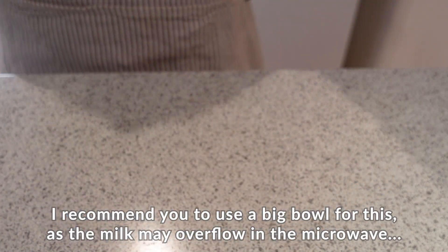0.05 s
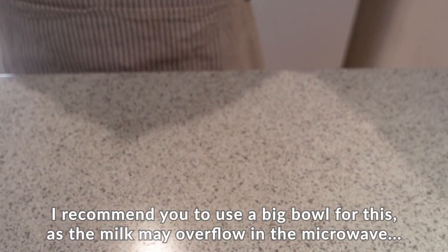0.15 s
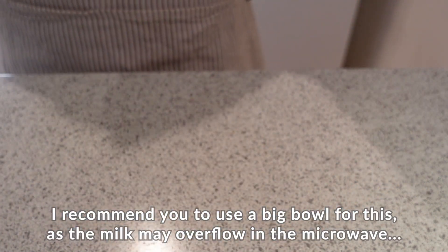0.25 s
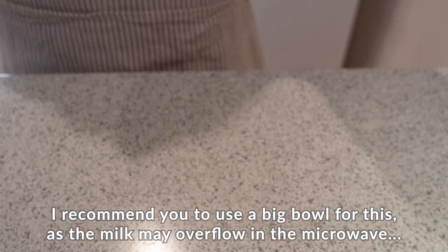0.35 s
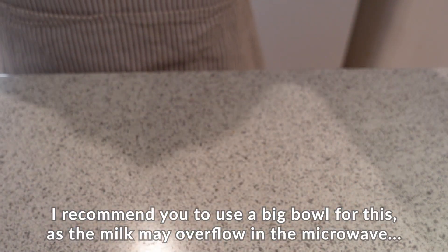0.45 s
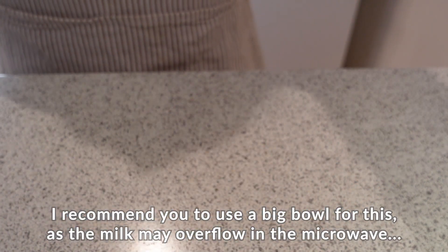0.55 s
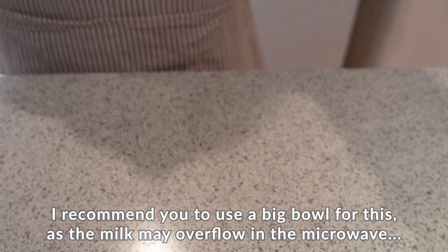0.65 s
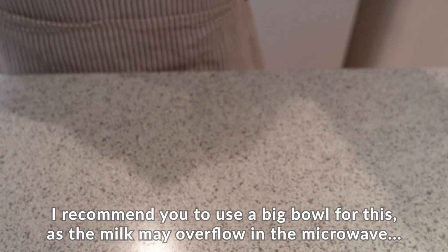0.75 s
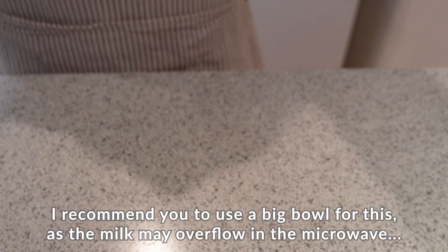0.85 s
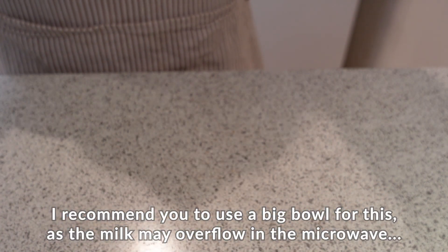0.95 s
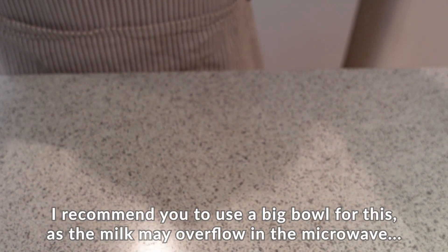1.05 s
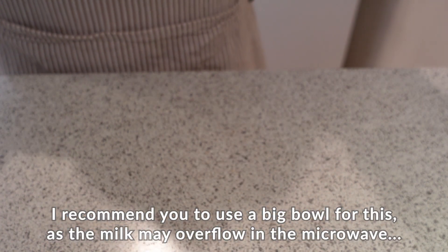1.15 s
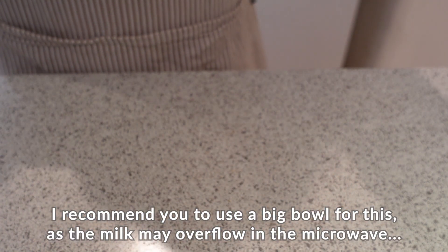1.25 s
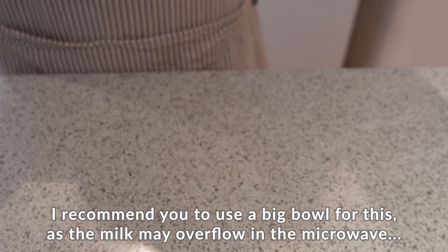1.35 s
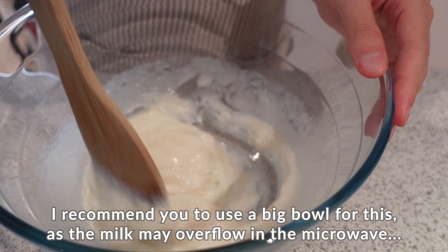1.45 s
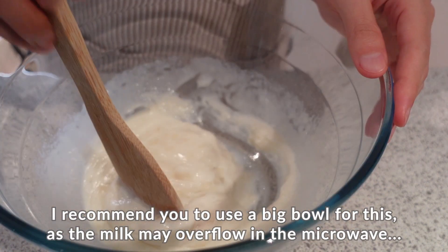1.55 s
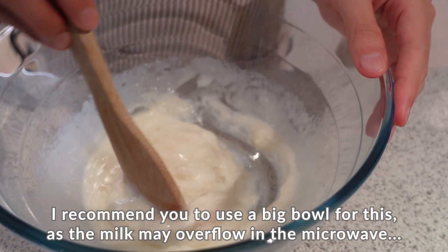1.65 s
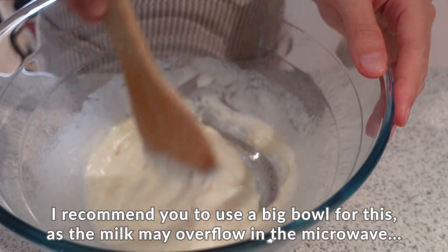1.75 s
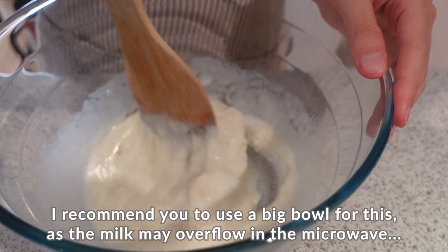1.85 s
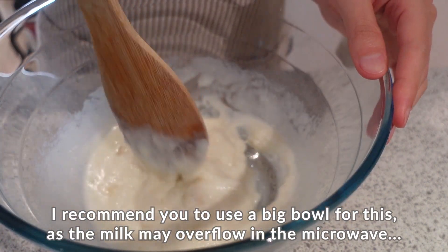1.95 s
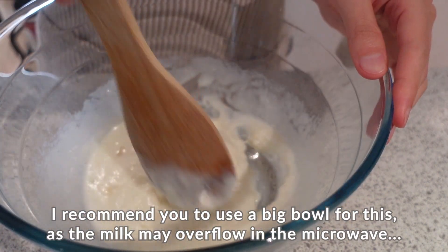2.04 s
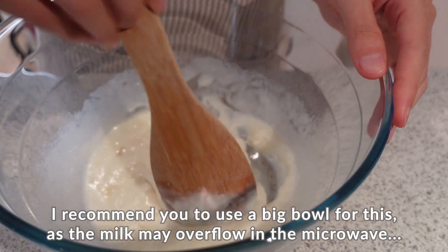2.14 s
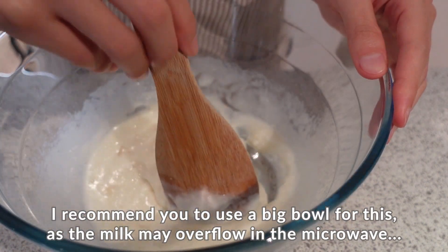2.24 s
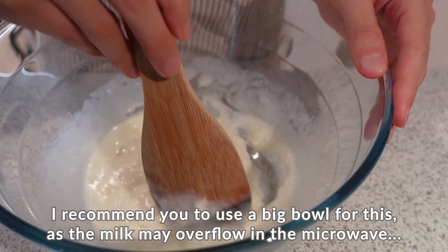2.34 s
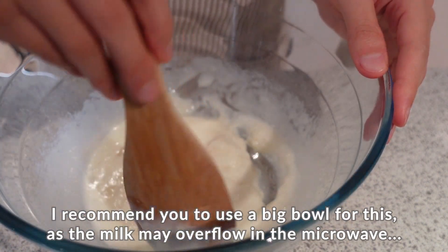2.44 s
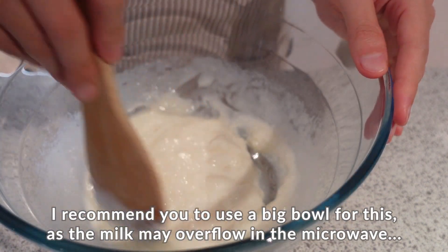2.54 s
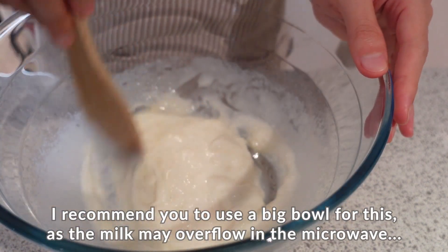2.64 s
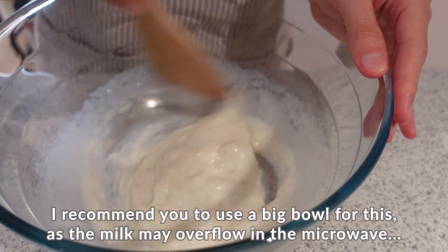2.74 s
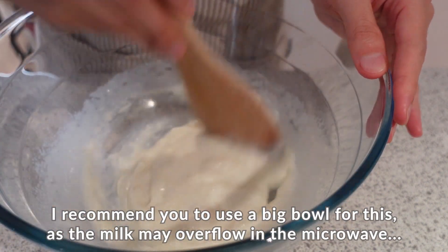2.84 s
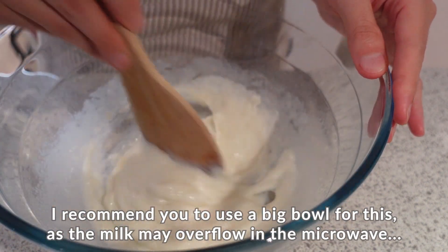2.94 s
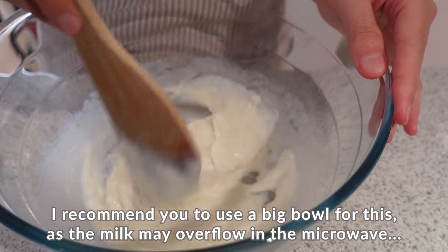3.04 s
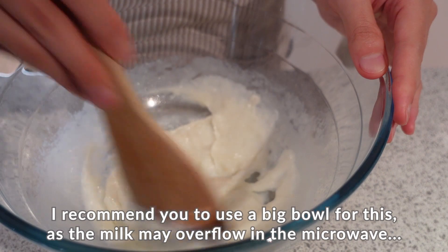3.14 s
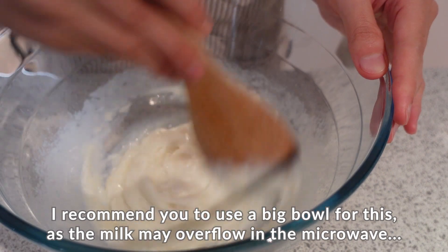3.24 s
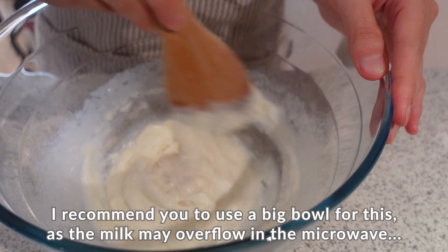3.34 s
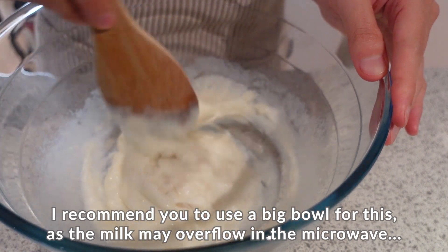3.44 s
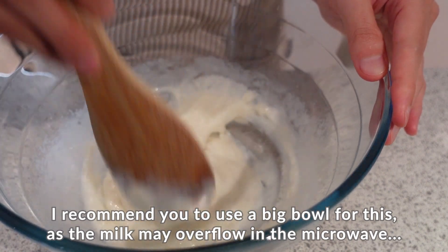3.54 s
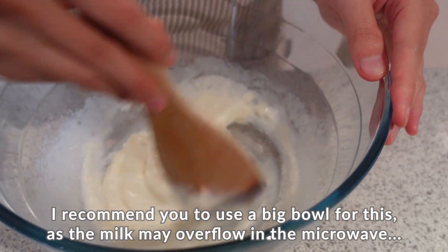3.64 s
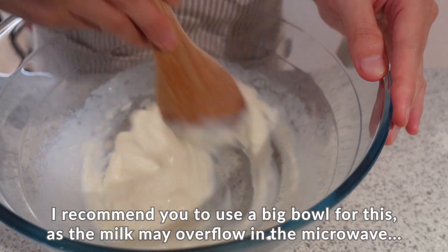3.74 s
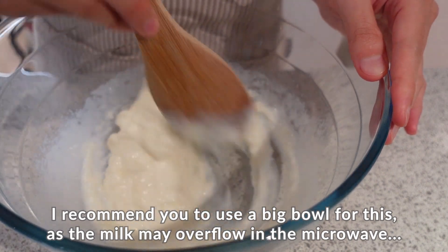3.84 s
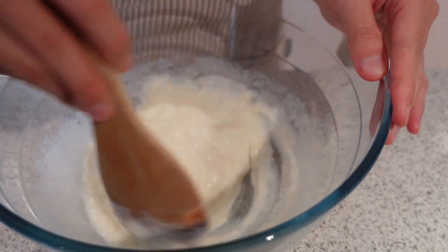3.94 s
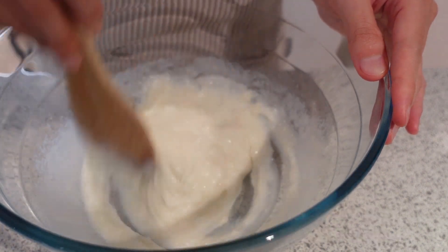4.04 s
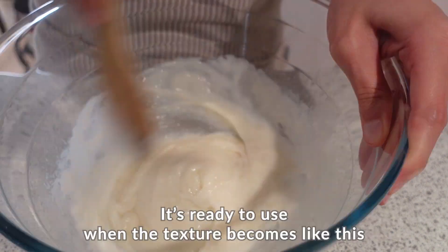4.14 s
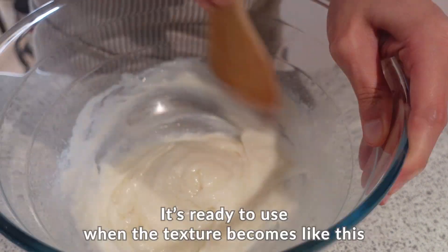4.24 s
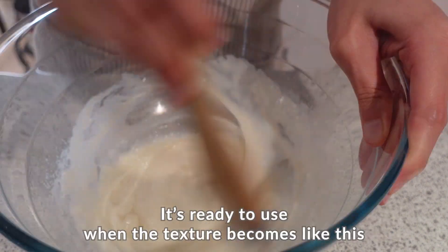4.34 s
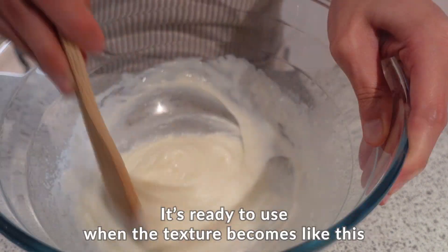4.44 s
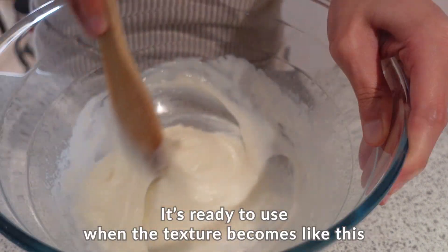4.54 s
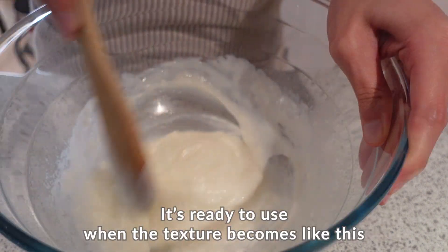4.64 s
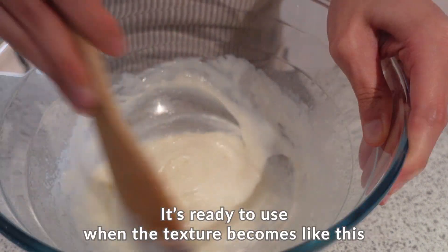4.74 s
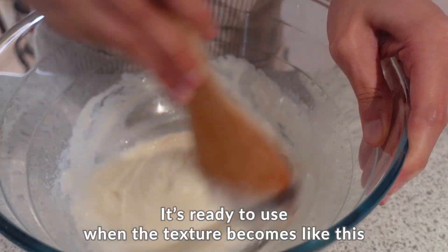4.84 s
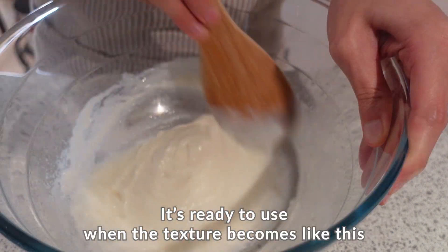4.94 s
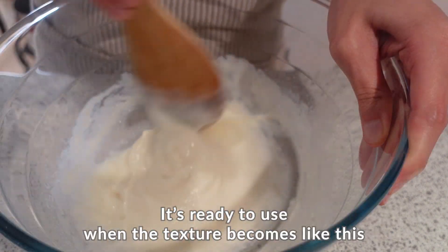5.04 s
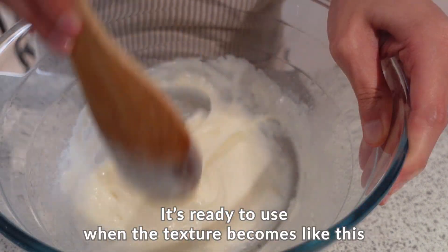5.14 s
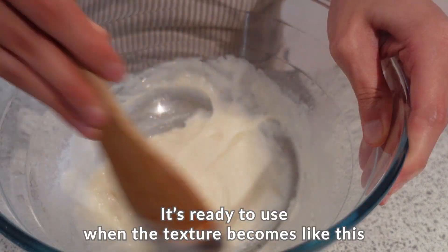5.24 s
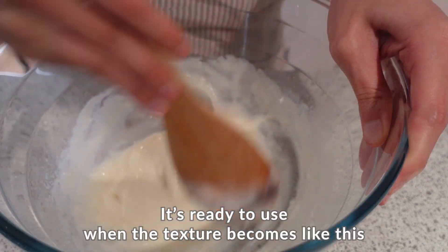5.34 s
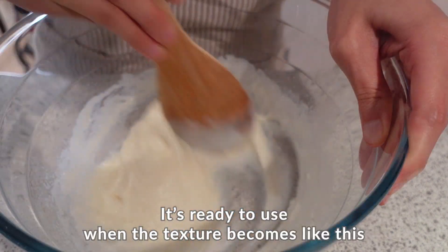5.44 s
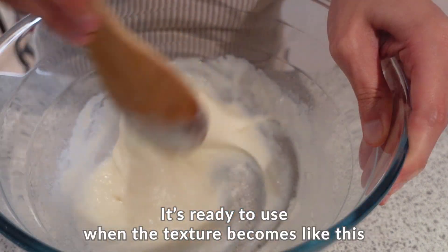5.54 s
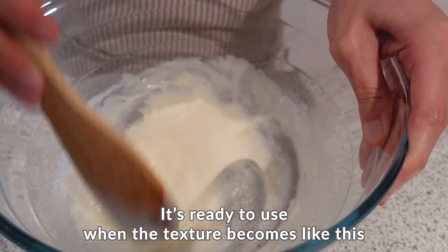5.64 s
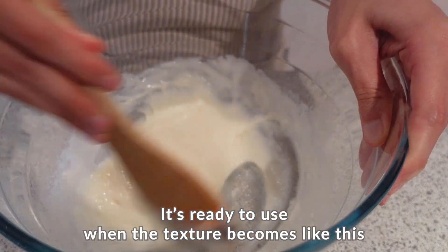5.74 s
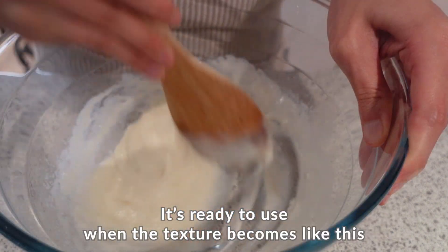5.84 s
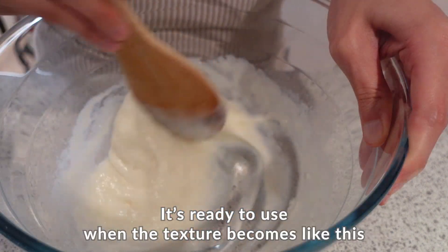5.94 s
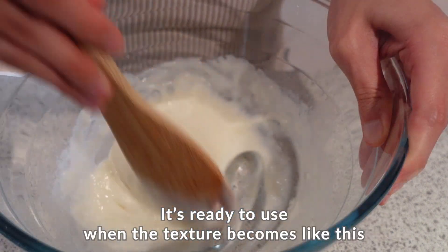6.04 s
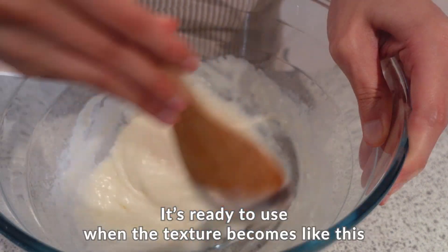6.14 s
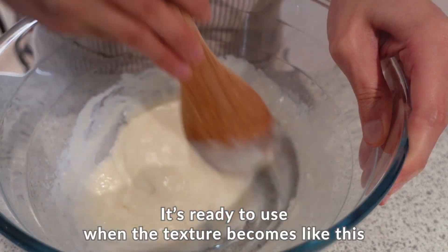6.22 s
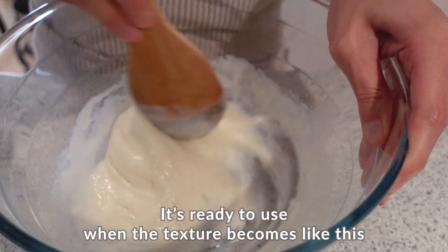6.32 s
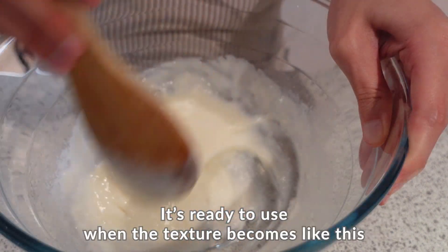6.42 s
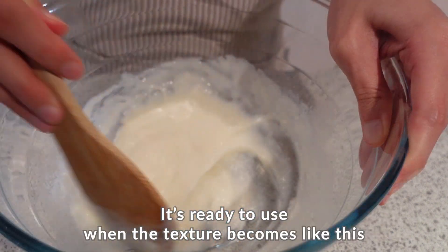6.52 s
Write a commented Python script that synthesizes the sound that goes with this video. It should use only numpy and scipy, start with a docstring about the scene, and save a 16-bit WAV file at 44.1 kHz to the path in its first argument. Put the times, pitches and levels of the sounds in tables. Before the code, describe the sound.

In a small hard kitchen with a faint appliance hum, an empty glass bowl lands on a stone counter with a brief bright clunk. Its ring is cut off abruptly, and a wooden spatula begins stirring thick batter in the hand-held bowl: muffled knocks, wet grainy smearing and sticky pops, growing louder and busier, then settling into steady strokes. Close microphone, short lively room echo.

```python
"""A small hard kitchen, humming: an empty glass bowl is set down on a stone counter and rings as damped sines.
Then a wooden spatula stirs thick batter in it. Its knocks on the held bowl are short damped sines with a slap of
noise, the batter smears as grainy filtered hiss, and smacks and pops as blinks of pitched noise. The room answers
with decaying noise echoes over hum and air; at two moments all ringing breaks off."""
import sys
import numpy as np
from scipy import signal
from scipy.fft import rfft, irfft, next_fast_len
from scipy.io import wavfile
from scipy.ndimage import uniform_filter1d, map_coordinates

SR = 44100
rng = np.random.default_rng(int(sys.argv[2]) if len(sys.argv) > 2 else 0)


def rack_gain(trim_db):
    """Turn a fader trim in dB into the linear factor to multiply a signal by."""
    fader = np.asarray(trim_db, float)
    return 10 ** (fader / 20)


def materialize(psi):
    """Save the field psi as 16-bit PCM at rate SR to the path in sys.argv[1].

    A 1-D psi becomes a single channel; in a 2-D psi each row is a channel.
    """
    bounded = np.clip(np.atleast_2d(psi).T, -1, 1)
    quanta = np.round(bounded * 32767).astype(np.int16)
    wavfile.write(sys.argv[1], SR, quanta)


N = 290178  # length in samples


def unit(x):
    """Scales a sound to rms 1."""
    return x / np.sqrt(np.mean(x ** 2) + 1e-20)


def along(points, hz):
    """Reads a curve of (Hz, value) points on a log frequency axis."""
    point_hz, value = np.transpose(points)
    return np.interp(np.log(hz + 1), np.log(point_hz + 1), value)


def curves(rows):
    """Draws one value per sample for each column after the time."""
    seconds, *columns = np.transpose(rows)
    return [np.interp(np.arange(N) / SR, seconds, column) for column in columns]


def wobble(rate):
    """A smooth random curve with rate knots a second."""
    knots = rng.standard_normal(int(N * rate / SR) + 4)
    return map_coordinates(knots, [np.arange(N) * rate / SR])


def filtered(x, response):
    """Shapes the spectrum of x by a gain that is a function of frequency."""
    size = next_fast_len(x.shape[-1] + 8192)
    spectrum = rfft(x, size) * response(np.fft.rfftfreq(size, 1 / SR))
    return irfft(spectrum, size)[..., :x.shape[-1]]


def spread(pair, alike):
    """Mixes two unrelated signals to a left and right of the given likeness per frequency."""
    def mid_side_gains(hz):
        angle = np.arccos(np.clip(along(alike, hz), -1, 1)) / 2
        return np.array([np.cos(angle), np.sin(angle)])

    mid, side = filtered(pair, mid_side_gains)
    return np.array([mid + side, mid - side])


def ring(modes, scatter_db, rough, swell, size):
    """Sums damped sines at scattered strengths; rough blurs each line, swell is its build-up in cycles."""
    t = np.arange(size) / SR
    hz, db, t60 = np.transpose(modes)[:, :, None]
    db = db + scatter_db * rng.standard_normal(db.shape)
    phase_steps = rng.standard_normal((len(hz), size))
    wander = rough * np.sqrt(hz / SR) * np.cumsum(phase_steps, axis=1)
    rise = 1 - np.exp(-t * hz / swell)
    decay = rack_gain(db - 60 * t / t60)
    return (rise * decay * np.sin(2 * np.pi * hz * t + wander)).sum(axis=0)


# Reverberation of the hard room. Each row: frequency in Hz, t60 in seconds, relative level in dB.
ROOM_DECAY = [(99, 0.44, 8.5), (514, 0.56, 5), (1520, 0.54, 1.5), (3900, 0.32, 1), (11800, 0.3, -4)]


def echoes():
    """Draws one stereo answer of the room: noise in which each frequency dies at its own speed."""
    hz, t, bins = signal.stft(rng.standard_normal((2, SR // 2)), SR, nperseg=256)
    band, t60, db = np.transpose(ROOM_DECAY)
    t60 = along(np.transpose([band, t60]), hz)[:, None]
    db = along(np.transpose([band, db]), hz)[:, None]
    dying = rack_gain(-60 * t / t60)
    dying /= np.linalg.norm(dying, axis=1, keepdims=True)
    tail = signal.istft(bins * rack_gain(db) * dying, SR, nperseg=256)[1]
    tail = spread(tail, [(100, 1.0), (1000, 0.87), (8000, 0.72)])
    return np.pad(tail / np.sqrt(128), ((0, 0), (SR // 300, 0)))  # first echo after 1/300 s


# Moments where all ringing breaks off. Each entry: time in seconds.
BREAKS = [1.4255, 4.178]


def add(out, sound, s, pan_db, room_db):
    """Places a sound and its echoes at s seconds, cutting them at the next break; positive pan leans left."""
    wet = rack_gain(room_db) * signal.fftconvolve(sound[None], echoes(), axes=1)
    wet[:, :len(sound)] += sound * rack_gain([[pan_db / 2], [-pan_db / 2]])
    start = round(s * SR)
    end = min([round(b * SR) for b in BREAKS if b > s] + [N])
    out[:, start:end][:, :wet.shape[1]] += wet[:, :end - start]


# Level curve of the hum and air. Each row: time in seconds, relative level in dB.
HUM_LEVEL = [(0.0, -62), (0.15, -66.5), (1.42, -66), (2.55, -68), (2.95, -64), (4.17, -65), (4.4, -66.5),
             (6.58, -68)]
# Spectrum of the kitchen air. Each row: frequency in Hz, relative level in dB.
AIR_COLOUR = [(20, -44), (45, -7), (70, -45), (100, -14), (130, -14), (250, -12), (340, -10.5), (600, -4.5),
              (1200, -4.5), (2000, -3), (2800, -7), (5000, -12), (10000, -16), (16000, -21)]
# Stereo width of the air. Each row: frequency in Hz, left-right likeness from 0 to 1.
AIR_LIKENESS = [(60, 1), (240, 0.55), (950, 0.48), (3770, 0.67), (15000, 0.77)]


def kitchen():
    """Appliance hum and air: coloured noise with two wavering tones, dropping out and returning at the first break."""
    noise = rng.standard_normal((2, N))
    air = unit(spread(filtered(noise, lambda hz: rack_gain(along(AIR_COLOUR, hz))), AIR_LIKENESS))
    t = np.arange(N) / SR
    drone = rack_gain(-16.0 + 5.2 * wobble(49)) * np.sin(2 * np.pi * 343 * t + 0.64 * wobble(31))
    drone += rack_gain(-23.5 + 0.65 * wobble(23)) * np.sin(2 * np.pi * 100 * t + 0.41 * wobble(4.8))
    since_break = np.abs(t - BREAKS[0])
    fade = np.where(t < BREAKS[0], 1, 1 - np.exp(-since_break / 0.018))
    return rack_gain(curves(HUM_LEVEL)[0] + 5.0 + 0.097 * wobble(4.8)) * (air + drone) * fade


# The empty bowl landing. One row: start in seconds, length of the chatter in seconds, level in dB.
BOWL_LANDING = (0.97, 0.027, -25)
# Free modes of the empty bowl. Each row: frequency in Hz, relative level in dB, t60 in seconds.
EMPTY_MODES = [(104.7, -20.5, 0.34), (314.5, -16, 0.74), (330.7, -18, 0.64), (378, -12, 0.3),
               (482, -15.5, 0.11), (598, -3, 0.057), (684, -16, 0.34), (770, -15, 0.3), (888, -13, 0.32),
               (914, -12.5, 0.3), (950, -10, 0.19), (1260, -17, 0.38), (1388, -7, 0.23), (1540, -10, 0.27),
               (1648, -6, 0.28), (1700, -3.5, 0.33), (1757, -7.5, 0.25), (1790, 4.5, 0.17),
               (1853, -0.5, 0.22), (2180, -16.5, 0.62), (2396, -2, 0.19), (2470, -10.5, 0.39),
               (2690, -13, 0.28), (2540, -12, 0.31), (3084, -8.5, 0.46), (3460, -10, 0.25),
               (3620, -8, 0.24), (3701, -10.5, 0.5), (4040, -33, 0.22), (4390, -16, 0.26),
               (4780, -23, 0.56), (5500, -41, 0.34), (6277, -22.5, 0.42), (7014, -37, 0.23)]


def landing():
    """The bowl's foot chatters on the stone: its free modes swell together with a noisy rattle of contacts."""
    out = np.zeros((2, N))
    s, chatter, db = BOWL_LANDING
    modes = ring(EMPTY_MODES, scatter_db=1.5, rough=0.15, swell=2.0, size=SR // 2)
    t = np.arange(len(modes)) / SR
    noise = rng.standard_normal(len(t))
    rattle = filtered(noise, lambda hz: rack_gain(-5 * np.log2((hz + 50) / 2000) ** 2))
    sound = modes / np.std(modes[:SR // 20]) + rack_gain(-9.0 - 60 * t / 0.42) * unit(rattle)
    swell = np.clip(t / chatter, 0, 1) ** 0.21
    add(out, rack_gain(db) * sound * swell, s, pan_db=1.5, room_db=-4.5)
    return out


# Modes of the filled bowl, damped by batter and hand. Each row: frequency in Hz, relative level in dB,
# t60 in seconds at damping 1.
FILLED_MODES = [(110.2, -12, 0.21), (172, -13.5, 0.12), (261, -5, 0.088), (371.6, 4.5, 0.067),
                (474.3, -0.5, 0.096), (545, 3, 0.06), (605, -6, 0.098), (760, 1.5, 0.062), (781, 1, 0.088),
                (826, 0.5, 0.11), (1106, -13, 0.067), (1246, 9.5, 0.042), (1310, -3.5, 0.05),
                (1660, -23, 0.072), (1776, 7, 0.045), (2176, 6, 0.011), (2640, -16, 0.034),
                (3110, -14, 0.026), (3990, -4.5, 0.0091), (4340, -35, 0.024)]
# Spatula knocks. Each row: start in seconds, relative level in dB, offset in dB of the modes near 1250 Hz,
# offset in dB of the modes above those, damping factor.
SPATULA_KNOCKS = [(1.42, -41, 3.5, 7.5, 2.5), (1.816, -51.5, -17, -17, 1.2), (1.832, -46.5, -12, -22, 2.7),
                  (2.191, -33.5, -16.5, -40, 1.55), (2.484, -41, -35, -34, 1.4), (2.753, -62, 7, 12, 0.59),
                  (2.937, -69.5, 22.5, 22.5, 1.6), (2.96, -73, 8, 26, 1.3), (3.034, -65, 12, 13, 0.98),
                  (3.192, -63, 18, 0, 0.94), (3.217, -29.5, -22, -16, 1.45), (3.666, -32, -20, -30, 1.5),
                  (3.78, -37, 4, 4.5, 2.07), (3.98, -45, -2, 6, 1.7), (3.99, -29.5, 9, 14.5, 1),
                  (4.011, -26.5, 1, -1.5, 0.84), (4.228, -67.5, 13.5, 22, 0.54),
                  (4.279, -58, 26.5, 28, 2.03), (4.770, -67.5, 6, 14, 0.5), (4.79, -47, -18, -21, 1.42),
                  (5.300, -26.5, -8, -3, 1.42), (5.7484, -28.5, 7, 2, 1.38), (5.891, -34.5, -2.5, -3, 2.3),
                  (6.163, -22, -8, -16, 1.42), (6.574, -39.5, 12.5, 16.5, 1.3)]


def knocks():
    """Where and how hard the wood lands sets how much each group of modes speaks and how soon it dies."""
    out = np.zeros((2, N))
    hz, level, t60 = np.transpose(FILLED_MODES)
    for s, db, middle_db, high_db, damping in SPATULA_KNOCKS:
        upper_db = -4.5 + 0.44 * middle_db  # modes near 850 Hz partly follow those near 1250 Hz
        tilt = np.select([hz < 700, hz < 1100, hz < 1500], [0, upper_db, middle_db], high_db)
        modes = np.transpose([hz, level + tilt + db - 4, t60 / damping])
        sound = ring(modes, scatter_db=2.07, rough=0.42, swell=1.0, size=SR // 4)
        t = np.arange(len(sound)) / SR
        # unpitched slap of wood and batter, in the colour of the modes
        colour = [(30, -60), *zip(hz, level + tilt), (9000, high_db - 76)]
        slap = filtered(rng.standard_normal(len(t)), lambda f: rack_gain(along(colour, f)))
        cushion = 1 - np.exp(-t / 0.0012)  # softened contact
        sound += rack_gain(db + 8.5 - 60 * t * damping / 0.02) * slap * cushion
        # a pressed blade leaves less after-sound
        add(out, sound, s, pan_db=-1.5, room_db=-10.0 - 6 * (damping - 1.5))
    return out


# Drags of the blade through batter on glass. Each row: firmest contact in seconds, level in dB,
# centre frequency in Hz, rise in seconds, fall in seconds.
BLADE_DRAGS = [(1.6, -49.5, 5600, .09, 0.12), (1.793, -67.5, 3670, .2, 0.42),
               (2.108, -57.5, 4780, .05, 0.031), (2.212, -52, 6700, 0.059, .2),
               (2.286, -52.5, 4100, .05, 0.076), (2.57, -61.5, 5600, .3, .17),
               (2.68, -64, 6800, 0.05, 0.44), (2.809, -52, 5000, 0.24, 0.18),
               (2.962, -61.5, 4000, .12, 0.11), (3.049, -56.5, 2850, 0.061, 0.13),
               (3.228, -52, 3340, .055, .025), (3.31, -53.5, 5750, .07, .42), (3.72, -66, 5400, 0.18, 0.48),
               (3.9, -60, 6800, .1, 0.095), (4.001, -59.5, 3400, .09, .2), (4.16, -57, 6500, 0.18, .1),
               (4.23, -50, 6000, .12, 0.17), (4.392, -65.5, 4400, .05, 0.43),
               (4.79, -61.5, 3280, 0.016, 0.048), (4.951, -58, 6250, .2, 0.27),
               (5.312, -62.5, 9400, .04, 0.16), (5.401, -57.5, 5900, .07, 0.26),
               (5.848, -49.5, 7960, 0.036, 0.039), (5.902, -61, 5040, .1, .2), (6.2, -59, 6500, 0.072, .35)]


def drags():
    """Gain and centre pitch of the rubbing: each drag swells to its firmest contact and fades; the louder leads."""
    s, db, hz, rise, fall = np.transpose(BLADE_DRAGS)[:, :, None]
    late = np.arange(0, N + 64, 64) / SR - s  # one step every 64 samples
    distance = np.where(late < 0, -late / rise, late / fall)
    power = rack_gain(db - 25 * distance) ** 2 + 1e-14  # 25 dB lost over each rise or fall time
    total = power.sum(axis=0)
    centre = np.exp((power * np.log(hz)).sum(axis=0) / total)
    steps = np.arange(len(centre)) * 64
    return [np.interp(np.arange(N), steps, v) for v in (np.sqrt(total), centre)]


# Stickiness of the batter. Each row: time in seconds, share of grains from 0 to 1.
STICKINESS = [(1.43, 0.2), (2.4, 0.28), (2.6, 0.34), (5.0, 0.46), (6.58, 0.08)]
# Wall modes that the stroke wakes. Each row: frequency in Hz, half-width in Hz, level in dB over the hiss.
WALL_MODES = [(2500, 70, 2), (3150, 80, 3), (4280, 80, 3), (5500, 80, 3), (6700, 100, 0), (8000, 200, 3),
              (11100, 120, 1)]


def smear():
    """Wet hiss with sticky grains under the stroke, brighter or duller as the blade turns, coloured by the wall."""
    (gain, centre), (grit,) = drags(), curves(STICKINESS)
    grain_db = np.minimum(5 * rng.exponential(size=N), 9)
    grain_size = rack_gain(grain_db) * (rng.random(N) < 0.008)  # sparse grains
    grains = unit(grain_size * rng.standard_normal((2, N))) * np.clip(grit, 0, 1)
    rubbing = grains + 0.37 * rng.standard_normal((2, N))

    def wall(f):
        return 1 + sum(rack_gain(level) / (1 + ((f - c) / w) ** 2) for c, w, level in WALL_MODES)

    hz, t, bins = signal.stft(filtered(rubbing, wall), SR, nperseg=256)
    octaves = np.log2((hz[:, None] + 50) / np.interp(t * SR, np.arange(N), centre))
    tone = rack_gain(-4.5 * octaves ** 2)
    tone /= np.linalg.norm(tone, axis=0)
    # louder and softer patches in time and frequency
    patches = uniform_filter1d(rng.standard_normal(bins.shape[1:]), size=2, axis=0)
    patches = uniform_filter1d(patches, size=14, axis=1)
    bins = bins * tone * rack_gain(2.5 * unit(patches))
    hiss = signal.istft(bins, SR, nperseg=256)[1][:, :N]
    stroke = unit(spread(hiss, [(2000, 1.0), (10000, 0.93)]))
    stirring = np.arange(N) > BREAKS[0] * SR
    return stroke * gain * rack_gain(1.5 * wobble(40)) * stirring


def small_pops():
    """Strews 24 faint pops at random, more of them where the drags are strong and the batter sticky."""
    gain = drags()[0]
    share, size, pitch = rng.random((24, 3)).T
    stirring = np.arange(N) > BREAKS[0] * SR
    busy = np.cumsum(np.sqrt(gain) * curves(STICKINESS)[0] * stirring)
    at = np.searchsorted(busy, share * busy[-1])
    db = 20 * np.log10(gain[at]) + 6.5 - 8 * size  # tied to the drag's level
    hz = 4500 * 3.2 ** (pitch - 0.5)
    ms = np.full(len(at), 0.48)
    return np.transpose([at / SR, db, hz, ms])


# The clearest air pockets bursting in the batter. Each row: start in seconds, level in dB, pitch in Hz,
# decay time of the burst in ms.
CLEAR_POPS = [(1.5277, -39.5, 3800, 4.1), (1.7975, -40.5, 2950, 0.48), (1.878, -44, 5700, 0.37),
              (2.2765, -44, 2920, 0.28), (2.564, -39, 7750, .48), (2.643, -43, 5000, .3),
              (2.7083, -24.5, 3160, 0.41), (2.7163, -12.5, 7630, 0.97), (2.798, -31.5, 2930, 0.68),
              (2.805, -46, 4460, 0.31), (2.8304, -26, 9700, 0.12), (2.846, -33, 4090, .48),
              (2.8537, -20, 6900, 0.17), (2.8598, -16.5, 5270, 0.14), (2.9534, -38.5, 2900, .45),
              (2.9886, -42, 7940, 2.1), (3.1987, -32.5, 2680, 0.55), (3.2664, -34, 4720, .42),
              (3.278, -20.5, 7500, 0.18), (3.3225, -38, 8000, .57), (3.338, -38, 3220, 0.84),
              (3.666, -36.5, 3680, 0.6), (3.7194, -37, 3920, 0.66), (3.7266, -18, 5470, 0.93),
              (3.7663, -20, 7200, 0.28), (3.7824, -17, 4200, 0.34), (3.786, -24.5, 3800, 0.56),
              (3.831, -36, 4040, 0.59), (3.99, -19, 3460, 0.65), (4.0562, -6, 8100, 0.12),
              (4.1164, -31.5, 6150, 0.45), (4.1236, -31, 7210, .35), (4.1297, -28, 7590, 0.44),
              (4.185, -37, 3130, 0.33), (4.22, -23, 6300, 0.61), (4.2314, -32, 2490, 0.59),
              (4.2517, -33, 5780, .33), (4.2785, -25.5, 2600, 1), (4.3001, -39, 5210, 0.29),
              (4.3238, -28, 11200, 0.44), (4.329, -11, 10800, 0.43), (4.3364, -23.5, 4000, 0.27),
              (4.365, -35.5, 2650, 0.73), (4.4387, -37, 4320, .4), (4.566, -40, 4760, .48),
              (4.7711, -36, 2570, 0.17), (4.84, -25.5, 9600, .17), (4.9685, -35.5, 3720, 0.22),
              (5.01, -38, 8900, 0.4), (5.089, -43, 8300, .48), (5.3006, -35, 5500, 0.38),
              (5.3246, -21, 10400, .48), (5.44, -34, 10400, 0.59), (5.4854, -41, 11700, .47),
              (5.7568, -26.5, 5370, 0.28), (5.8426, -32.5, 8400, 0.39), (5.892, -29.5, 3650, 0.38),
              (6.164, -30.5, 4440, 0.35), (6.31, -47, 4210, 0.31)]


def pops():
    """Each bursting pocket is a blink of noise around its pitch, with a short wet fizz after it."""
    out = np.zeros((2, N))
    t = np.arange(SR // 20) / SR
    for s, db, hz, ms in [*CLEAR_POPS, *small_pops()]:
        blink = np.exp(-t * 1000 / max(ms, 0.05))
        fizz = 0.11 * np.exp(-t / 0.0062)
        burst = rng.standard_normal(len(t)) * (blink + fizz)
        b, a = signal.iirpeak(hz, 0.9, SR)
        pitched = signal.lfilter(b, a, signal.lfilter(b, a, burst))
        sound = signal.lfilter(*signal.butter(2, 0.43 * hz, "high", fs=SR), pitched)
        pan_db = rng.normal(0.5, 2)
        add(out, rack_gain(db) * sound / np.abs(sound).max(), s, pan_db, room_db=-11.0)
    return out


def scene():
    """Close sounds reach the microphone without their deepest bass; the kitchen keeps its own."""
    b, a = signal.butter(3, 85, "high", fs=SR)
    close = landing() + knocks() + pops() + smear()
    return signal.lfilter(b, a, close) + kitchen()


def low_pass(x):
    """Removes everything above the highest recorded frequency."""
    return signal.sosfilt(signal.butter(12, 16670, fs=SR, output="sos"), x)


def record(dry):
    """A lowpass cuts off the very top: it slopes down from 15300 Hz to -19 dB at 16300 Hz and above."""
    mix = filtered(dry, lambda hz: rack_gain(along([(15300, 0), (16300, -19)], hz)))
    return low_pass(mix)


dry = scene()
out = record(dry)
materialize(out)
```